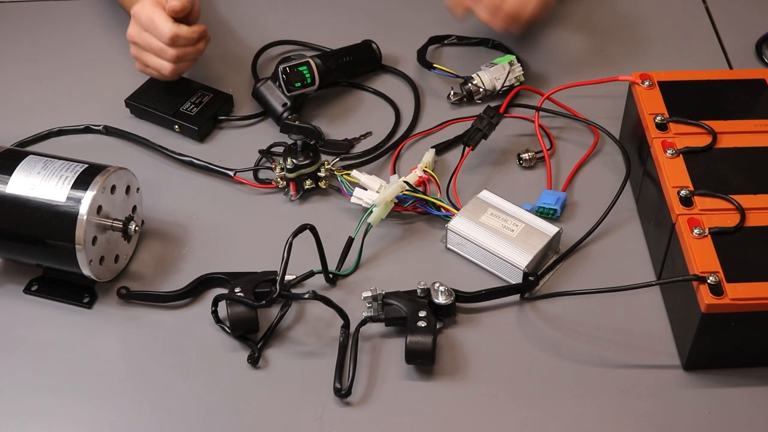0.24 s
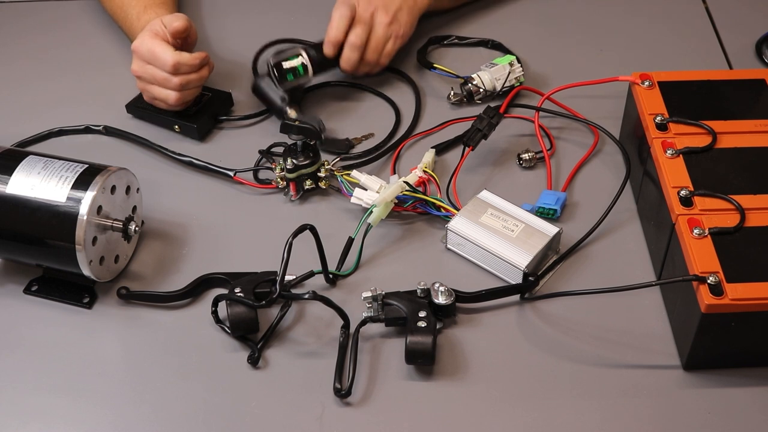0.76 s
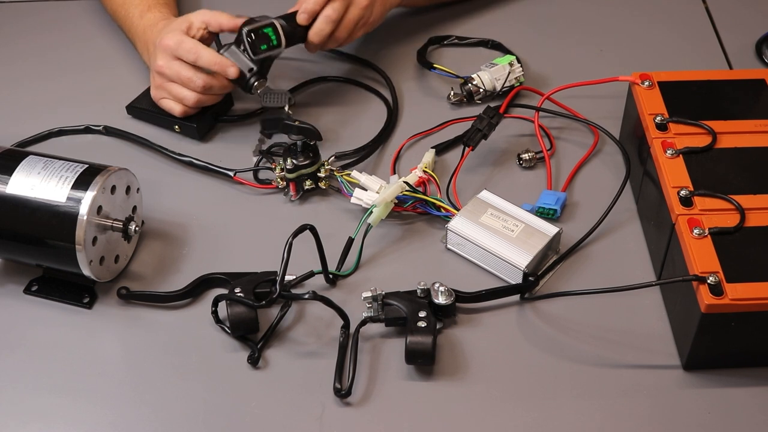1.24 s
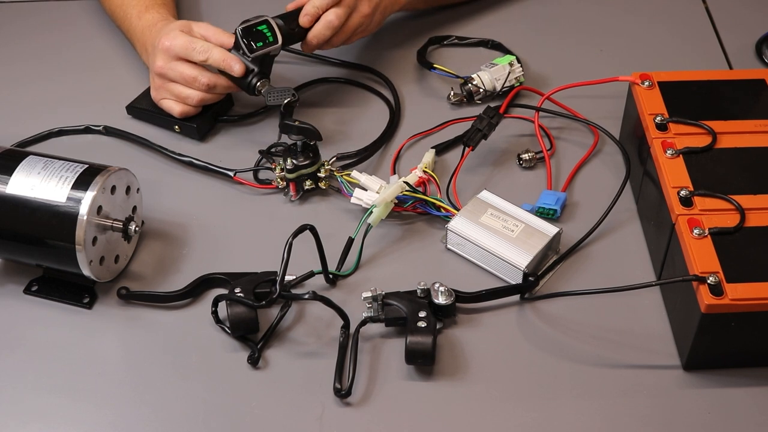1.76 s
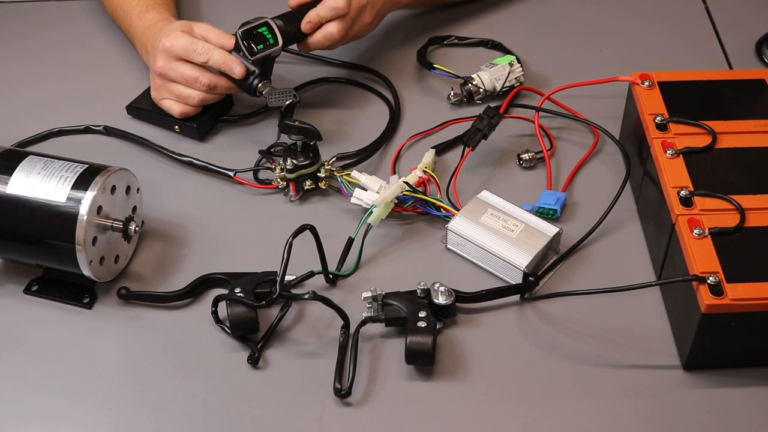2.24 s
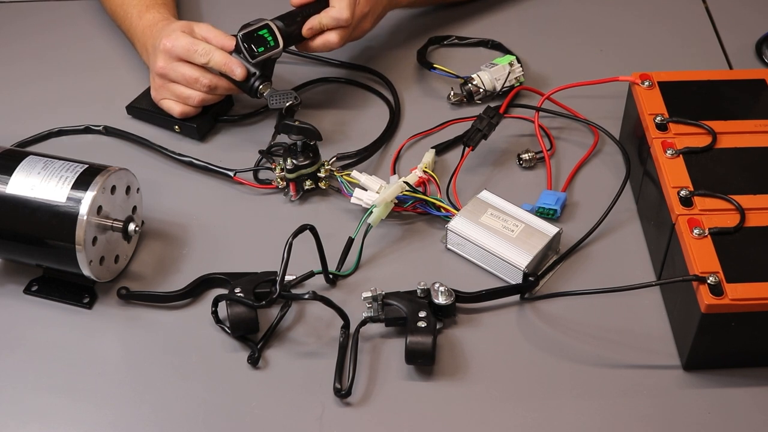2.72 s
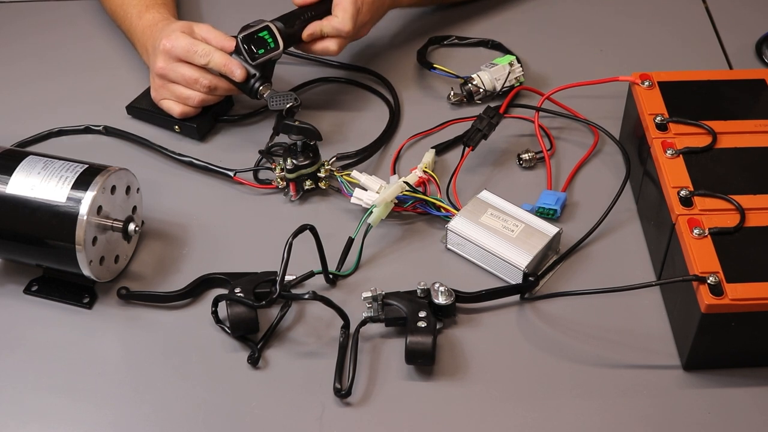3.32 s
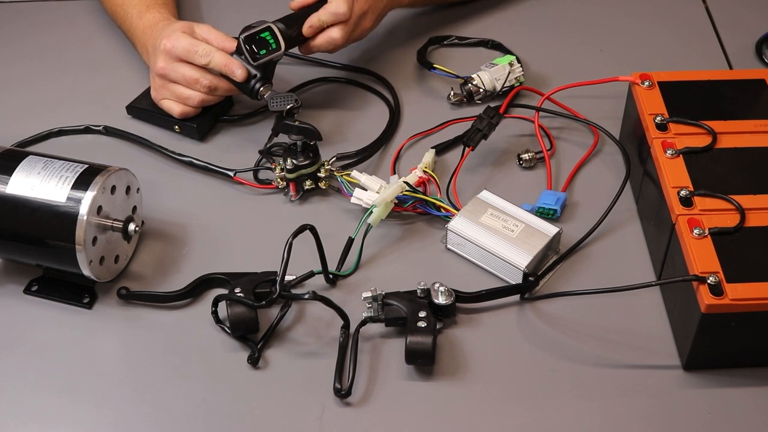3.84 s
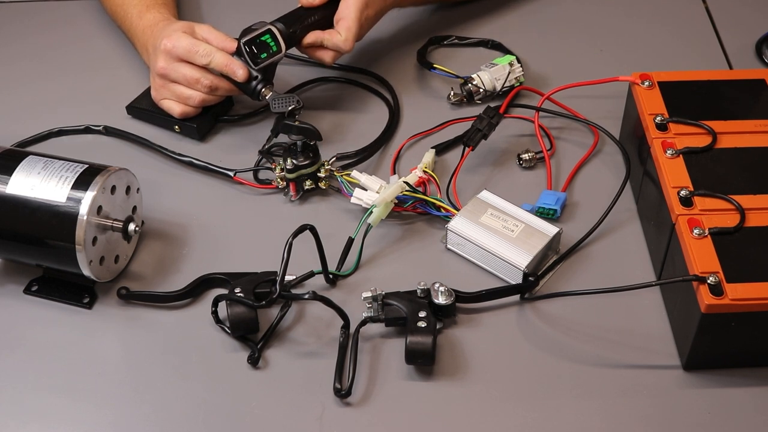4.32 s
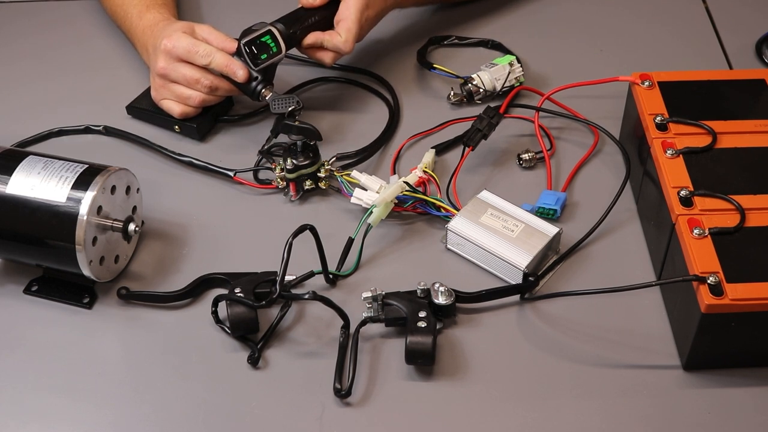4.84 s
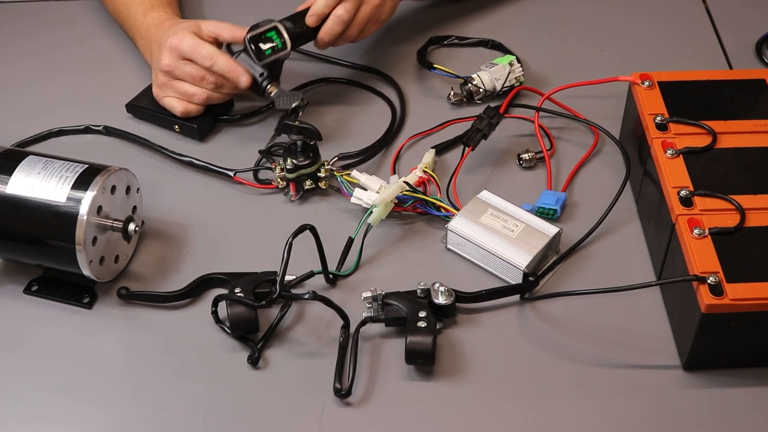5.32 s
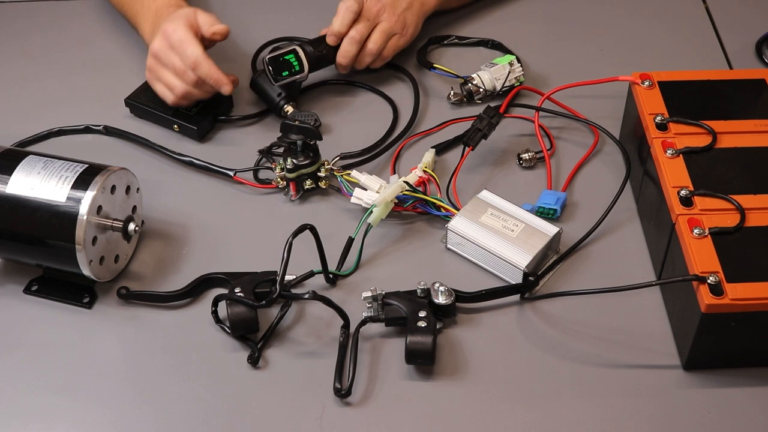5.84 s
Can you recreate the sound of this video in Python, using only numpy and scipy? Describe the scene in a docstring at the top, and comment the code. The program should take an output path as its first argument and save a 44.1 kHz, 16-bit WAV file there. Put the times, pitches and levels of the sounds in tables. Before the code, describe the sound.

A twist throttle clatters as it is picked up, then a small brushed motor revs three times, each higher, and starts winding down.

```python
"""Brushed motor on a workbench

Hands pick up a twist throttle; plastic parts knock, cables drag, a sleeve brushes past.
The throttle opens three times. The armature's 20 slots whine through bench and casing, each shaft
turn repeats its rattle, the brushes hiss, and the chopper sings near 14 kHz while current flows."""
import sys
import numpy as np
from scipy import signal
from scipy.fft import rfft, irfft, next_fast_len
from scipy.io import wavfile
from scipy.ndimage import uniform_filter1d

SR = 44100
rng = np.random.default_rng(int(sys.argv[2]) if len(sys.argv) > 2 else 0)


def master(y):
    """Save y as 16-bit WAV."""
    cut = np.clip(np.atleast_2d(y).T, -1, 1)
    pcm = np.round(cut * 32767)  # scale
    wavfile.write(sys.argv[1], SR, pcm.astype(np.int16))


N = 267907

# room noise spectrum (frequency [Hz], relative density [dB])
ROOM_SPECTRUM = [(12, -39), (20, 0.5), (163, 1), (193, -8), (337, 0), (542, -11), (873, -3.5), (1370, -31),
                 (2670, -22.5), (5380, -18.5), (8650, -29.5), (12400, -23), (16000, -24)]
# sleeve pass (centre [s], Gaussian sigma [s], level [dB])
SLEEVE_PASS = (0.71, 0.058, -46)
# drags over the bench (start [s], peak [s], end [s], relative scrape [dB], rustle [dB])
DRAGS = [(-0.05, 0.001, 0.22, -33.5, -27), (0.0, 0.603, 1.2, -55.5, -47), (0.722, 0.867, 1.05, -32, -44),
         (1.157, 1.2, 1.55, -42.5, -63), (1.255, 1.404, 1.637, -31, -54), (1.006, 1.706, 4.9, -61, -54.5),
         (2.304, 2.7, 4.6, -53, -62), (2.627, 2.725, 2.84, -34, -56), (2.801, 2.88, 2.967, -32.5, -56),
         (4.13, 4.215, 4.22, -36, -46), (5.1, 5.499, 5.97, -33.5, -39.5), (5.899, 6.077, 5.9, -42, -53)]
# cable scrape spectrum (frequency [Hz], relative density [dB])
SCRAPE_SPECTRUM = [(59, -42), (100, -27), (185, -7), (266, 2.5), (429, 5.5), (768, -4.5), (881, 3.5),
                   (2300, -11), (2640, -25), (3350, -15.5), (6000, -26), (7800, -61), (13200, -120)]
# sleeve and wire rustle spectrum (frequency [Hz], relative density [dB])
RUSTLE_SPECTRUM = [(1470, -11.5), (2500, 8.5), (2700, -17), (3180, 3.5), (3720, 1.5), (4800, 0.5),
                   (6300, 2.5), (7710, 3), (9290, -4), (12000, -2), (16000, -27.5)]

# plastic knocks, relative levels (time [s], snap [dB], clack [dB], tick [dB], bench thud [dB])
SINGLE_KNOCKS = [(0.0074, -9.5, -11, 0, -16), (0.0111, -4.5, 0, -12, -41), (0.0163, -30, -9.5, -19, -26),
                 (0.2409, -37, -26, -34, -51), (0.2879, -48, -24, -36, -23), (0.3006, -44, -17, -41, -10),
                 (0.3115, -44, -41, -35, -5), (0.7199, -25.5, -37, -25, -20.5),
                 (0.8155, 1.5, -8, -7.5, -37), (0.8481, -2.5, 2, -26, -2), (0.9111, -20, -10.5, -38, -36),
                 (0.9578, -20, -16, -27, -29), (1.1461, -3.5, 7.5, -17, -6), (1.1722, -6, 2.5, -56, -38),
                 (1.2009, -15, -6.5, -43, -37), (1.3565, -23.5, -13.5, -38, -40),
                 (1.4318, -24, -15, -52, -24), (1.5, -43, -20, -51, -27), (1.7003, -35, -31, -65, -32),
                 (2.339, -61, -41, -56, -38), (2.8605, -34, -22, -46, -33), (4.157, -24, -34, -46, -42),
                 (4.2203, -21, -12.5, -42, -26), (5.2024, -25, -35, -28, -31), (5.3344, -30, -32, -45, -11),
                 (5.4913, -2, -25, -9, -16), (5.5499, -21, -16.5, -31, -10), (5.6298, -29, -10.5, -37, -17),
                 (5.7237, -26, -13, -19, -22), (5.7551, -19, -24, -22, -18), (6.0439, -36, -18, -45, -12.5)]
# tumbling parts (start [s], length [s], maximum relative snap [dB])
TUMBLES = [(0.921, 0.062, -24), (1.184, 0.1, -26.5), (1.398, 0.045, -22.5), (2.683, 0.046, -27),
           (2.719, 0.05, -34), (5.385, 0.049, -22)]
# tumble offsets (snap [dB], clack [dB], tick [dB], thud [dB])
TUMBLE_OFFSETS_DB = (3, 9, -12, -6.5)
# snap, clack and tick bands (low [Hz], high [Hz], T60 factor [1])
BURST_BANDS = [(2590, 5400, 0.75), (600, 1890, 2.47), (5560, 11200, 0.71)]
# hard plastic and key resonances (frequency [Hz], width [Hz], gain [dB])
SNAP_MODES = [(3500, 900, -9.5), (4470, 99, 0), (5200, 160, -3)]
# bench modes (frequency [Hz], gain [dB], T60 [s])
BENCH_MODES = [(45, -11.5, 0.19), (137, -10.5, 0.082), (193, -10.5, 0.09), (262, -3, 0.17),
               (293.7, 3.5, 0.079), (350, -1.5, 0.16), (428.2, -1, 0.21), (494, -8, 0.21)]

# throttle held open (start [s], end [s])
THROTTLE_HOLDS = [(2.42, 2.94), (3.299, 3.86), (4.03, 5.17)]
# armature speed (time [s], slot rate [Hz])
SLOT_RATE = [(2.36, 39.84), (2.46, 97.9), (2.58, 183.7), (2.65, 224.7), (2.73, 253.5), (2.86, 269.2),
             (2.96, 254.6), (3.1, 214.8), (3.34, 152.4), (3.47, 345), (3.56, 444), (3.63, 474.8),
             (3.71, 487), (3.8, 477), (4.03, 405.6), (4.13, 392.7), (4.27, 466), (4.37, 505), (4.49, 518.4),
             (4.8, 534.8), (5.1, 540), (5.18, 529.3), (5.45, 438.1), (5.81, 323.4), (6.07, 244.6)]
# pull on the bench (shaft order [1], drive [dB])
BENCH_PULL = [(4, -41), (6, -51), (20, -27)]
# chopper sidebands (slot harmonic [1], level re carrier [dB])
CHOPPER_SIDEBANDS = [(1, -11), (2, -12), (3, -12)]
# brush friction spectrum (frequency [Hz], relative density [dB])
BRUSH_SPECTRUM = [(500, -16.5), (900, 0), (1500, -13), (3000, -7), (6000, -11), (12000, -14.5),
                  (16000, -34)]
# casing resonances (frequency [Hz], width [Hz], gain [dB])
CASING_MODES = [(82, 20, -9), (267, 38, -14), (317.4, 17, -7), (436, 37, 2.5), (517, 14, 1), (659.7, 73, 7),
                (924, 43, -14), (1180, 130, -22), (1690, 320, -13.5), (2166, 850, -82.5)]
# steel shell resonances (frequency [Hz], width [Hz], gain [dB])
SHELL_MODES = [(2370, 134, -3), (3420, 80, -20), (3608, 104, -1), (4158, 146, 5.5), (4850, 50, 1),
               (4910, 77, -7), (6550, 460, 1), (7460, 185, 4.5), (7490, 380, 2.5), (7860, 140, -29),
               (10130, 240, -3)]
# upper whine (slot harmonic [1], relative level [dB])
UPPER_PARTIALS = [(5, 14), (6, 13), (7, 11.5), (8, 9.5), (9, 8), (10, 1.5), (11, -9), (12, -15), (13, -3),
                  (14, 3), (15, -1), (16, -2), (19, -10)]
# low whine (slot harmonic [1], drive [dB], change when coasting [dB])
LOW_PARTIALS = [(1, -28.5, -3), (2, -28, 0.5), (3, -34, 0.5), (4, -43.5, 0.5)]
# mount resonances (frequency [Hz], width [Hz], gain [dB])
MOUNT_MODES = [(96, 23, 0), (258, 27, 0), (337, 34, 2), (397, 16, 11), (422, 12, 6), (470, 8, 1),
               (514, 27, 6.7), (552, 44, -1.7), (632, 37, 11), (694, 49, 15.5), (768, 28, -9), (878, 76, 2),
               (1028, 19, -9.7), (1328, 200, -5), (1598, 20, 0), (2129, 25, 12.4)]
# polarity per mount mode (sign [1]); a partial dips between modes of like sign
MOUNT_SIGNS = [1, -1, 1, -1, 1, -1, -1, -1, -1, 1, 1, -1, -1, 1, -1, -1]

SLOTS, FULL_SLOT_HZ, CHOPPER_HZ = 20, 530, 13978
TIME_S = np.arange(N) / SR


def amp(db):
    """dB to gain."""
    return 10 ** (np.asarray(db) / 20)


def unit_rms(x):
    """Scale to RMS 1."""
    return x / np.sqrt(np.mean(x ** 2) + 1e-20)


def drift(rate_hz):
    """Slow random wander, RMS 1."""
    r = np.exp(-2 * np.pi * rate_hz / SR)
    return unit_rms(signal.lfilter([1], [1, -2 * r, r * r], rng.standard_normal(N + SR))[SR:])


def butter(x, edges_hz, kind):
    """Butterworth filter."""
    return signal.sosfilt(signal.butter(2, edges_hz, kind, fs=SR, output="sos"), x)


def coloured(x, spectrum):
    """Apply a spectrum; RMS 1."""
    size = next_fast_len(N)
    bin_hz = np.maximum(np.fft.rfftfreq(size, 1 / SR), 1)
    hz, db = np.transpose(spectrum)
    gain = amp(np.interp(np.log(bin_hz), np.log(hz), db))
    return unit_rms(irfft(rfft(x, size) * gain, size)[:N])


def resonate(x, modes):
    """Parallel resonators, alternating signs."""
    out = 0
    for k, (hz, width_hz, db) in enumerate(modes):
        r = np.exp(-np.pi * width_hz / SR)
        b = (1 - r * r) / 2 * np.array([1, 0, -1])
        a = [1, -2 * r * np.cos(2 * np.pi * hz / SR), r * r]
        out = out + (-1) ** k * amp(db) * signal.lfilter(b, a, x)
    return out


def narrow_noise(hz, width_hz):
    """Noise through one resonator, RMS 1."""
    return unit_rms(resonate(rng.standard_normal(N), [(hz, width_hz, 0)]))


def grains(rate_hz, spread_db, bed_rms):
    """Uneven random clicks on a noise bed."""
    sizes = amp(spread_db * np.minimum(rng.exponential(1, N), 5)) * rng.choice([-1, 1], N)
    clicks = sizes * (rng.random(N) < rate_hz / SR)
    return unit_rms(clicks) + bed_rms * rng.standard_normal(N)


def room_tone(level_db=-49.5):
    """Low, slowly wavering room noise."""
    return amp(level_db + 1.5 * drift(1.7)) * coloured(rng.standard_normal(N), ROOM_SPECTRUM)


def reverb(x, t60_s, wet_db):
    """Diffuse workshop tail: dull, decaying noise."""
    age_s = np.arange(int(0.6 * SR)) / SR
    tail = signal.lfilter([1], [1, -0.5], rng.standard_normal(len(age_s)))
    tail *= amp(-60 * age_s / t60_s) * (age_s > 0.004)
    return amp(wet_db) * signal.fftconvolve(x, tail / np.sqrt(np.sum(tail ** 2)))[:N]


def sleeve_swish():
    """Cloth brushes past: one airy swell."""
    centre_s, sigma_s, db = SLEEVE_PASS
    air = unit_rms(butter(rng.standard_normal(N), [10000, 15000], "band"))
    return amp(db) * np.exp(-0.5 * ((TIME_S - centre_s) / sigma_s) ** 2) * air


def cable_drag(swell_db=21):
    """Cables scrape in dense low grains; sleeves and wires rustle above."""
    scrape = rustle = 0
    for start_s, peak_s, end_s, scrape_db, rustle_db in DRAGS:
        rise = (TIME_S - peak_s) / (peak_s - start_s)
        fall = (peak_s - TIME_S) / (end_s - peak_s)
        shape_db = swell_db * np.minimum(rise, fall)
        scrape += amp(scrape_db + shape_db)
        rustle += amp(rustle_db + shape_db)
    scrape *= amp(5 + 2.2 * drift(40))
    scrape *= coloured(grains(rate_hz=1500, spread_db=3.5, bed_rms=1.1), SCRAPE_SPECTRUM)
    rustle *= amp(0.5 * drift(30.6))
    rustle *= coloured(grains(rate_hz=3300, spread_db=3.5, bed_rms=1.6), RUSTLE_SPECTRUM)
    return scrape + rustle


def tumble_knocks(per_run=6, range_db=12):
    """Parts tumble: knock rows of random time and strength."""
    return [(start_s + length_s * when, *(db - range_db * drop + np.array(TUMBLE_OFFSETS_DB)))
            for start_s, length_s, db in TUMBLES for when, drop in rng.random((per_run, 2))]


def bench_thuds(onsets, levels_db, spread_db=4, cutoff_hz=600):
    """Each blow rings the bench modes unevenly; the soft contact cuts the treble."""
    out = np.zeros(N)
    scatter_db = rng.normal(0, spread_db, (len(onsets), len(BENCH_MODES)))
    for (hz, db, t60_s), offsets_db in zip(BENCH_MODES, scatter_db.T):
        blows = np.zeros(N)
        blows[onsets] = amp(levels_db + db + offsets_db)
        r, w = amp(-60 / (t60_s * SR)), 2 * np.pi * hz / SR
        out += signal.lfilter([0, np.sin(w)], [1, -2 * r * np.cos(w), r * r], blows + 1e-18)
    return butter(out, cutoff_hz, "low")


def plastic_knocks(base_t60_s=0.029, sharp_t60_s=0.018, sharp_above_db=-10):
    """Bench thud plus three noise bursts per knock; treble dies first, hard snaps are shorter."""
    times_s, *band_db, thud_db = np.transpose(list(SINGLE_KNOCKS) + tumble_knocks())
    onsets = (times_s * SR).astype(int)
    out = bench_thuds(onsets, thud_db - 17)
    t60s_s = np.where(band_db[0] > sharp_above_db, sharp_t60_s, base_t60_s)
    age_s = np.arange(4096) / SR
    bursts = rng.standard_normal((len(onsets), len(BURST_BANDS), len(age_s)))
    for k, (low_hz, high_hz, t60_factor) in enumerate(BURST_BANDS):
        track = np.zeros(N + len(age_s))
        for onset, db, t60_s, burst in zip(onsets, band_db[k], t60s_s, bursts[:, k]):
            envelope = amp(db + 2.5 - 60 * age_s / (t60_factor * t60_s))
            track[onset:onset + len(age_s)] += envelope * burst
        out += butter(track[:N], [low_hz, high_hz], "band")
        if k == 0:  # snap band
            out += 1.5 * resonate(track[:N], SNAP_MODES)
    return out


def throttle_gain(open_db_per_s=250, close_db_per_s=198):
    """1 while held; ramps up before, down after."""
    ramps_db = [np.minimum(open_db_per_s * (TIME_S - on_s), close_db_per_s * (off_s - TIME_S))
                for on_s, off_s in THROTTLE_HOLDS]
    return amp(np.minimum(0, np.max(ramps_db, axis=0)))


def turn_pattern(shaft_rad, points):
    """Random roughness, repeated each turn."""
    angles_rad = np.linspace(0, 2 * np.pi, points, endpoint=False)
    return np.interp(shaft_rad, angles_rad, rng.standard_normal(points), period=2 * np.pi)


def bench_drone(shaft_rad, load, mode_hz=79, width_hz=10):
    """The motor pulls on the bench top, which booms harder under load."""
    pull = sum(amp(db) * np.sin(k * shaft_rad) for k, db in BENCH_PULL)
    rumble = amp(-41 + 9 * load) * rng.standard_normal(N)
    return 2 * resonate(pull + rumble, [(mode_hz, width_hz, 0)])


def chopper(shaft_rad):
    """Chopped current sings; it dips at each slot and follows the flaws of the turn."""
    ripple = 1 + sum(2 * amp(db + 2.8 * drift(4.4)) * np.cos(k * SLOTS * shaft_rad)
                     for k, db in CHOPPER_SIDEBANDS)
    for k, phase_rad in enumerate(rng.uniform(0, 2 * np.pi, SLOTS - 1), 1):
        ripple += 0.3 / k ** 0.25 * np.cos(k * shaft_rad + phase_rad)
    carrier = np.sin(2 * np.pi * CHOPPER_HZ * TIME_S)
    return unit_rms(ripple * carrier + 0.5 * narrow_noise(CHOPPER_HZ, width_hz=700))


def brush_hiss(shaft_rad):
    """Brushes rub the same rough copper each turn and ring the shell."""
    copper = 0.8 * turn_pattern(shaft_rad, points=1024)
    friction = rng.standard_normal(N) * (1 + 0.21 * np.cos(SLOTS * shaft_rad))
    hiss = coloured(copper + friction, BRUSH_SPECTRUM)
    return unit_rms(hiss + 2.07 * resonate(hiss, SHELL_MODES))


def casing_rattle(shaft_rad):
    """Commutator and bearing flaws shake the casing."""
    flaws = turn_pattern(shaft_rad, points=256)
    return unit_rms(resonate(flaws + 1.1 * rng.standard_normal(N), CASING_MODES))


def shell_whine(shaft_rad):
    """Upper slot harmonics swell as they cross shell modes."""
    drive = sum(amp(db + 2.5 * drift(12)) * np.sin(k * SLOTS * shaft_rad) for k, db in UPPER_PARTIALS)
    return unit_rms(resonate(drive, SHELL_MODES) + 0.34 * drive)


def mount_whine(shaft_rad, throttle, fade_in):
    """Low slot harmonics swell as they cross mount modes."""
    drive = fade_in * sum(amp(db + coast_db * (1 - throttle) + 2.2 * drift(18))
                          * np.sin(k * SLOTS * shaft_rad) for k, db, coast_db in LOW_PARTIALS)
    whine = sum(sign * resonate(drive, [mode]) for mode, sign in zip(MOUNT_MODES, MOUNT_SIGNS))
    wobble = 1 + 0.092 * np.sin(shaft_rad)  # shaft runout
    return np.sqrt(2) * whine * wobble


def motor(inertia_s=0.04, full_load_hz_per_s=870):
    """Speed sets pitch and levels; acceleration shakes casing and bench harder."""
    slot_hz = uniform_filter1d(np.interp(TIME_S, *np.transpose(SLOT_RATE)), int(inertia_s * SR))
    shaft_rad = 2 * np.pi * np.cumsum(slot_hz) / (SR * SLOTS)
    speed = slot_hz / FULL_SLOT_HZ
    speed_oct = np.log2(speed)
    load = np.clip(np.gradient(slot_hz) * SR / full_load_hz_per_s, 0, 1)
    throttle = throttle_gain()
    fade_in = np.clip((TIME_S - SLOT_RATE[0][0]) / 0.18, 0, 1)
    rattle_db = -34.5 + speed_oct + 4 * load + 2 * drift(1.6)

    whine = mount_whine(shaft_rad, throttle, fade_in)
    upper = amp(-42 + 6.5 * speed_oct) * shell_whine(shaft_rad)
    rattle = amp(rattle_db) * casing_rattle(shaft_rad)
    hiss = amp(-39.5 + 7.5 * speed_oct) * brush_hiss(shaft_rad)
    drone = (slot_hz > slot_hz[0]) * bench_drone(shaft_rad, load)
    ring = amp(-61) * narrow_noise(1715, width_hz=15)
    unbalance = amp(-47) * np.sqrt(2) * speed ** 2 * np.sin(shaft_rad)
    controller = amp(-48.5 + 4 * speed_oct) * throttle * chopper(shaft_rad)
    return whine + drone + controller + fade_in * (upper + rattle + hiss + ring + unbalance)


def scene():
    """Motor and handling on one bench in a quiet room; mono."""
    knocks, running, room = plastic_knocks(), motor(), room_tone()
    wet = reverb(knocks, t60_s=0.52, wet_db=-10.5) + reverb(running, t60_s=0.33, wet_db=-13)
    return (room + wet + cable_drag() + sleeve_swish() + knocks + running)[None]


def record(dry):
    """Gain control ducks on peaks and recovers; low-pass, then hard clip."""
    threshold_db, release_db_per_s, smoothing_s, cutoff_hz = -4, 150, 0.0084, 15750
    over_db = np.maximum(20 * np.log10(np.abs(dry[0]) + 1e-9) - threshold_db, 0)
    release_db = release_db_per_s * TIME_S
    duck_db = np.maximum.accumulate(over_db + release_db) - release_db
    r = np.exp(-1 / (smoothing_s * SR))
    levelled = dry * amp(-signal.lfilter([1 - r], [1, -r], duck_db))
    lowpass = signal.ellip(12, 0.5, 80, cutoff_hz, fs=SR, output="sos")
    return np.clip(signal.sosfilt(lowpass, levelled), -1, 1)


dry = scene()
out = record(dry)
master(out)
```